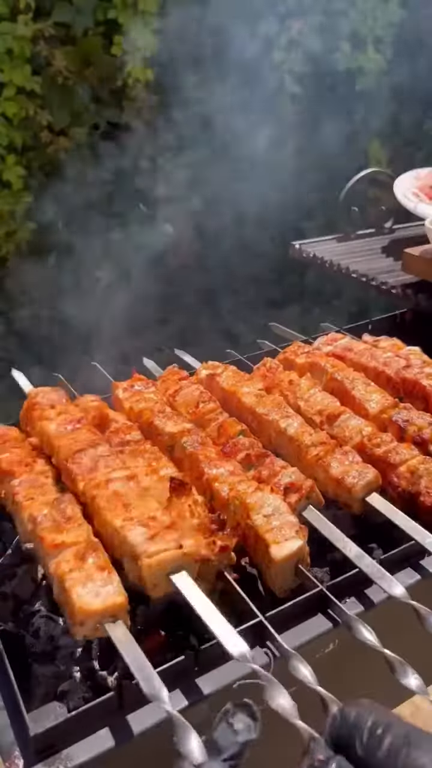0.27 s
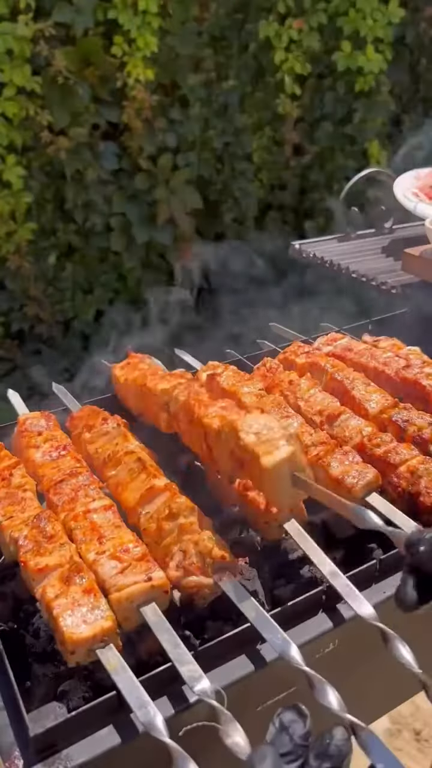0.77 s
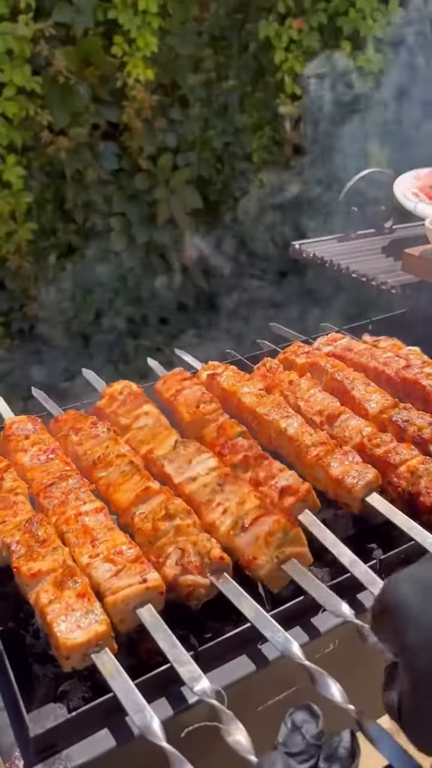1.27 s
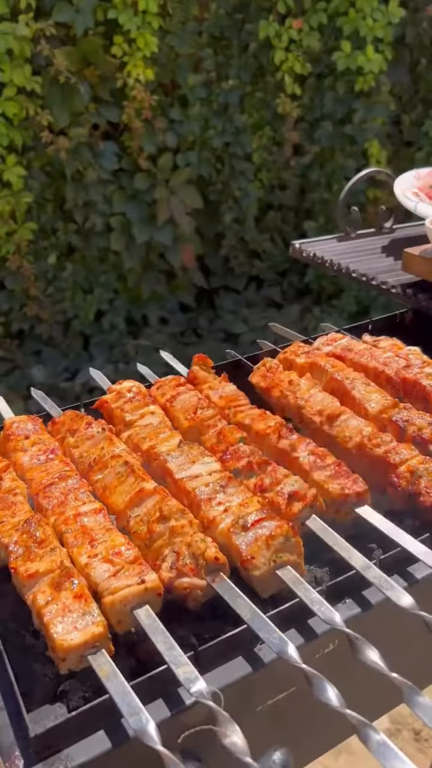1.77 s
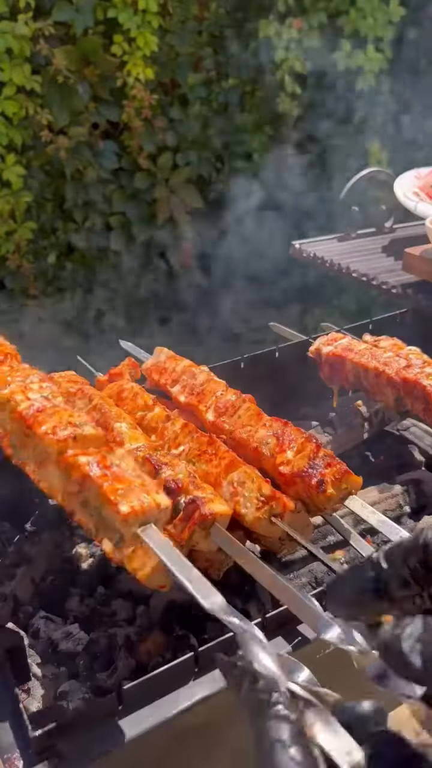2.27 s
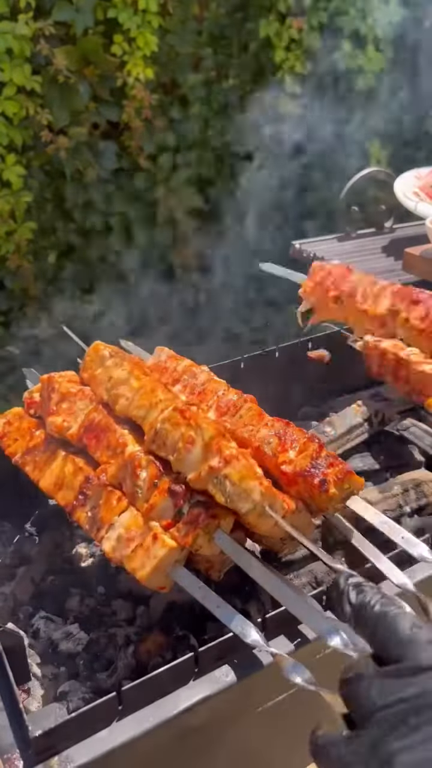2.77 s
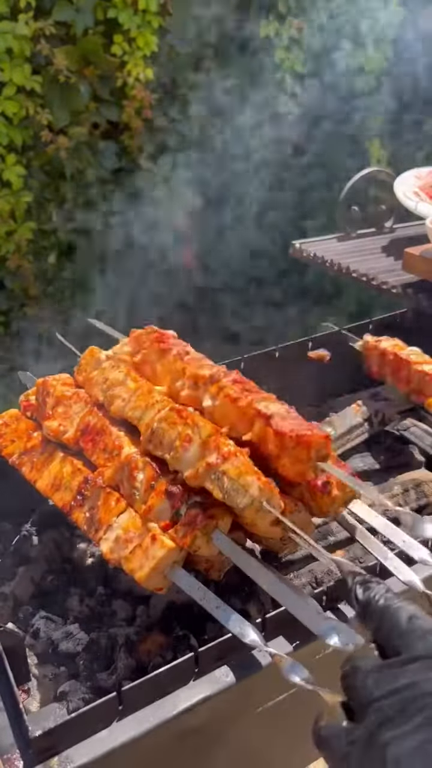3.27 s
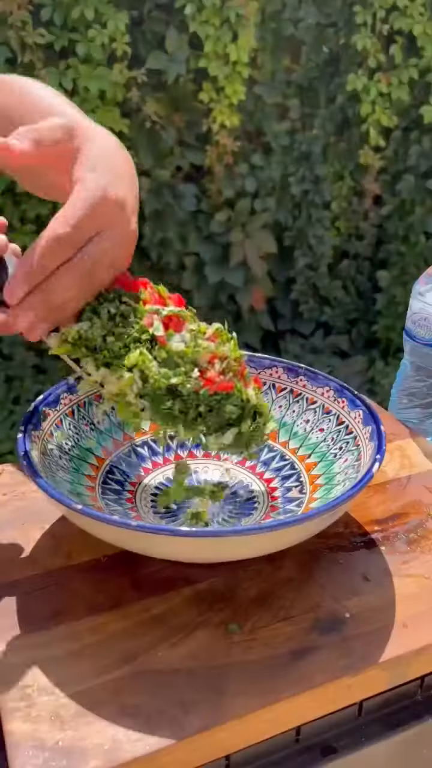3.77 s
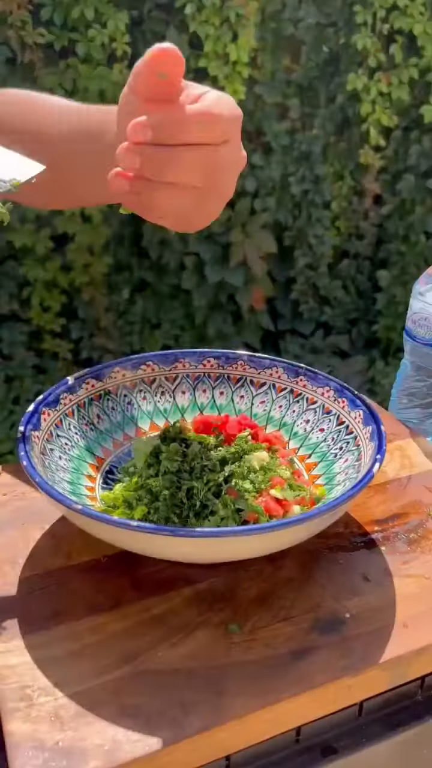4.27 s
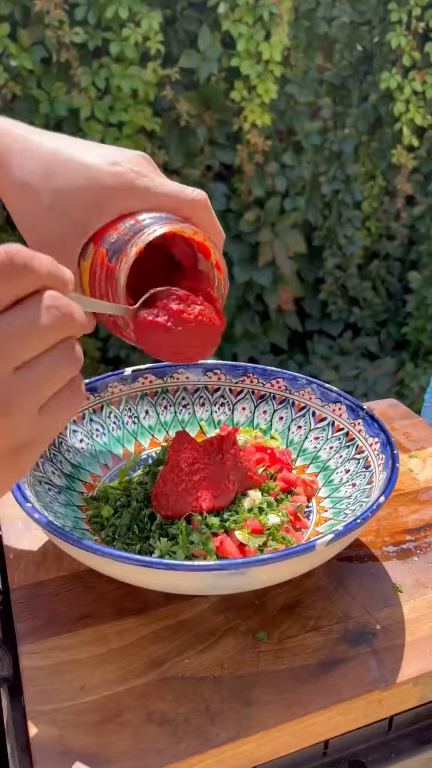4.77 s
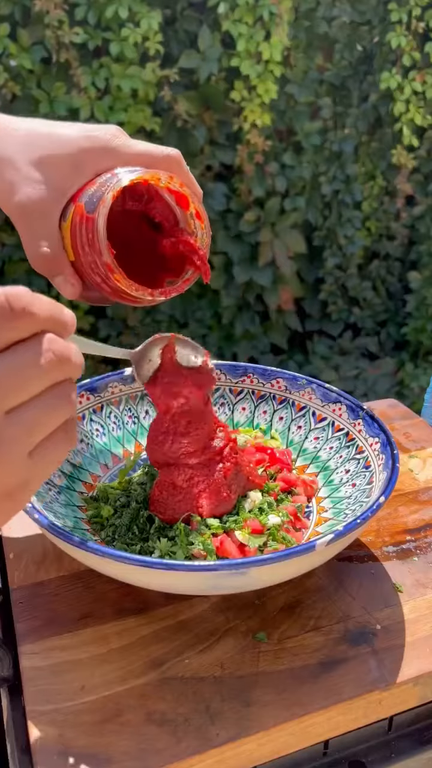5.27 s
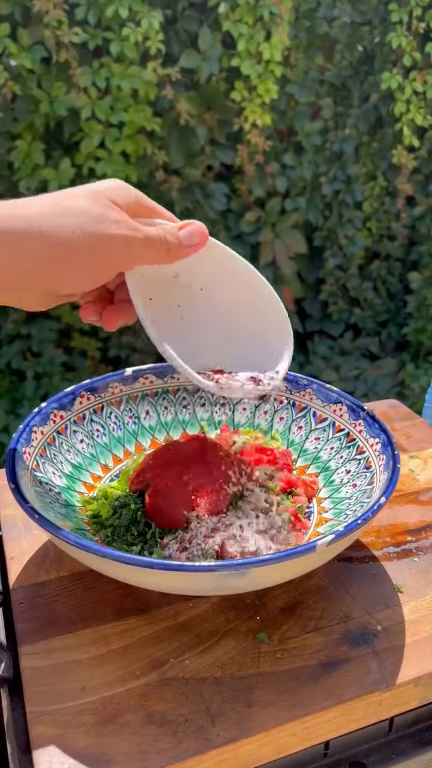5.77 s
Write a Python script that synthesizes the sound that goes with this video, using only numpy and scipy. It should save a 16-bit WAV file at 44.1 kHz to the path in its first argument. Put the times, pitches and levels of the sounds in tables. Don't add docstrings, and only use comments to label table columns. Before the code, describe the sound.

Loaded metal skewers clang and knock on a steel charcoal trough over hissing fat, then herbs scrape, a glass jar clinks and chopped onion patters.

```python
import sys
import numpy as np
from scipy import signal
from scipy.fft import rfft, irfft, next_fast_len
from scipy.io import wavfile

SR = 44100
rng = np.random.default_rng(int(sys.argv[2]) if len(sys.argv) > 2 else 0)


def waveform_to_disk(signal):
    frames = np.transpose(np.atleast_2d(signal))
    scaled = np.clip(frames, -1, 1) * 32767
    samples = np.round(scaled).astype(np.int16)
    wavfile.write(sys.argv[1], SR, samples)


def field_ratio(decibels):
    return 10 ** (np.asarray(decibels, dtype=float) / 20)


N = 265482

CUTS = [
    0.149,
    0.694,
    1.394,
    2.096,
    2.774,
    3.408,
    4.291,
    5.404,
]


def rms_one(x):
    return x / np.sqrt(np.mean(x ** 2) + 1e-20)


def in_time(rows, outside=None):
    s, *columns = np.transpose(rows)
    return [np.interp(np.arange(N) / SR, s, c, outside, outside) for c in columns]


def at_hz(points, hz):
    points = np.array(points)
    return np.interp(np.log(hz), np.log(points[:, 0]), points[:, 1])


def band(x, low_hz, high_hz):
    return signal.sosfilt(signal.butter(2, [low_hz, min(high_hz, .45 * SR)], "band", fs=SR, output="sos"), x)


def drift(rate):
    r = np.exp(-80 * np.pi * rate / SR)
    slow = signal.lfilter([1], [1, -2 * r, r * r], rng.standard_normal(N // 40 + 2002))[2000:]
    return np.interp(np.arange(N) / 40, np.arange(len(slow)), rms_one(slow))


def grains(per_s, spread_db, size=N):
    sizes = field_ratio(spread_db * np.minimum(rng.exponential(1, size), 5)) * rng.choice([-1, 1], size)
    return rms_one(sizes * (rng.random(size) < per_s / SR))


def resonate(x, hz, width_hz):
    r = np.exp(-np.pi * width_hz / SR)
    return rms_one(signal.lfilter([1, 0, -1], [1, -2 * r * np.cos(2 * np.pi * hz / SR), r * r], x))


def grains_in(bands, per_s, flicker_db, side, size):
    out = 0
    for hz, width_hz, level_db in bands:
        mid, apart = [resonate(grains(per_s, 1.0, size=size), hz, width_hz) for part in ("mid", "apart")]
        flicker = field_ratio(level_db + flicker_db * drift(22)[:size])
        out = out + flicker * (mid + side * apart * [[1], [-1]])
    return rms_one(out)


def mode_bank(modes, size=8000):
    hz, level_db, t60 = np.transpose(modes)[:, :, None].astype(np.float32)
    t = np.arange(size, dtype=np.float32) / SR
    decay = np.exp(np.log(10) / 20 * (level_db - 60 * t / t60))
    return decay * np.sin(2 * np.pi * hz * t)


def dense_bank(shape, count, damping=0.89):
    # frequency in Hz, t60 in seconds.
    ring_times = [(480, 0.065), (1400, 0.097), (3000, 0.12), (6000, 0.094), (15000, 0.052)]
    hz = np.sort(rng.uniform(shape[0][0], shape[-1][0], count))
    return hz, mode_bank(np.transpose([hz, at_hz(shape, hz), at_hz(ring_times, hz) / damping]))


def strike(bank, contact, side, tilt_db=0):
    sign, spread, lean = rng.standard_normal((3, len(bank)))
    weights = np.sign(sign) * field_ratio(2 * spread + tilt_db) * (1 + side * lean * [[1], [-1]])
    sound = signal.fftconvolve(weights.astype(np.float32) @ bank, contact[None], axes=1)
    return sound / np.abs(sound.mean(axis=0)).max()


def chatter(length_ms, landing=5.2, size=2600):
    t = np.arange(size) / SR
    holds = np.exp(-(1000 * t / np.clip(length_ms, .3, 30)) ** 1.4)
    contacts = rng.standard_normal(size) * (rng.random(size) < .07)
    full_landing = landing * (np.arange(size) == round(.0015 * SR))
    return contacts * holds * np.clip(t / 0.0056, 0, 1) + full_landing


def add(out, sound, s):
    start = round(s * SR)
    later_cuts = [round(c * SR) for c in CUTS if round(c * SR) > start]
    stop = min(later_cuts + [N, start + sound.shape[-1]])
    out[:, start:stop] += sound[..., :stop - start]


def swells(rows):
    t = np.arange(N) / SR
    take = np.searchsorted(CUTS, t)
    return sum(field_ratio(2 * db) * np.exp(-((t - s) / half_s) ** 2) * (take == np.searchsorted(CUTS, s))
               for s, db, half_s in rows)


def blows():
    # start in seconds, clang in dB, trough boom in dB, blade in dB, dullness in dB per octave.
    clinks = [(0.0552, -30.5, -49.5, -43.5, -1), (0.3612, -18.5, -35, -28, 2),
              (0.4222, -6, -12, -19.5, 2.5), (0.5224, -29, -24, -33, 2.5), (0.8123, -7, -28.5, -12, -3),
              (0.9598, -21.5, -35, -24, 3.5), (1.6338, -2.5, -14.5, -12.5, 1), (1.748, -8.5, -17, -18.5, 0),
              (2.591, -27.5, -46, -42, 1), (3.151, -51, -30, -42, 7)]
    drops = [(0.2413, -7, -14.5, -20, -1.5), (0.3835, -17.5, -27, -27, 3),
             (0.4035, -19.5, -40.5, -26.5, 3.5), (0.7758, -32, -37, -41, 1.5),
             (0.9985, -30, -32, -27.5, 4.5), (1.1154, -36, -29.5, -45, 2), (1.1805, -44, -48, -44, 7),
             (1.2666, -20, -30, -26.5, 2.5), (1.3349, -35, -33, -36.5, 3),
             (1.6476, -9.5, -17.5, -13.5, 1.5), (3.168, -33, -28.5, -29.5, 9)]
    slides = [(1.151, -42, -39, -36, 4.5), (2.5432, -27, -51, -47.5, 0), (2.7167, -44, -39.5, -50, 6.5),
              (3.0505, -18.5, -30.5, -29, 5), (3.0639, -26, -43, -25, 3)]
    # start in seconds, boom in dB.
    bounces = [(0.6343, -32), (0.6843, -25), (1.082, -44), (1.2394, -39), (1.844, -24), (1.927, -36),
               (1.9995, -39), (2.055, -44), (2.1107, -37.5), (2.165, -50.5), (3.2087, -33), (3.33, -34.5)]
    rebounds = [(s, boom_db - 12, boom_db, boom_db - 13, 4.5) for s, boom_db in bounces]
    kinds = [(clinks, 4.6, 4.1), (drops, 8.6, 4.1), (slides, 23.8, 1.2), (rebounds, 5.2, 4.1)]
    return sorted((*row[:4], ms, landing, row[4]) for rows, ms, landing in kinds for row in rows)


def skewers():
    # frequency in Hz, level in dB per Hz.
    sheet_shape = [(820, -34), (1400, -8.5), (2060, -3), (2310, -7.5), (2740, -6), (12900, -10),
                   (14700, -13), (16000, -15.5)]
    # frequency in Hz, level in dB.
    blade_shape = [(480, -15.5), (600, -9), (760, -1), (860, -3.5), (920, -9), (1000, -8), (1240, -8),
                   (1450, -12.5)]
    # frequency in Hz, level in dB, t60 in seconds.
    trough_modes = [(254, 1.5, 0.053), (317, 2.5, 0.058), (373, -3.5, 0.076), (220, -15.5, 0.054),
                    (234, -8.5, 0.11), (255.3, -7, .2), (282.6, -9, 0.16), (299.8, -5.5, 0.28),
                    (337, -10, 0.2), (350, -15.5, 0.24)]
    out = np.zeros((2, N))
    hz, sheet = dense_bank(sheet_shape[1:], count=900)
    blade = dense_bank(blade_shape, count=45, damping=0.84)[1]
    trough = mode_bank(trough_modes)
    for s, clang_db, boom_db, blade_db, length_ms, landing, dull_db in blows():
        contact = chatter(length_ms, landing)
        add(out, field_ratio(clang_db - 3.0) * strike(sheet, contact, 0.68, -dull_db * np.log2(hz / 4000)), s)
        add(out, field_ratio(blade_db + 3) * strike(blade, contact, .15), s)
        add(out, field_ratio(boom_db + 4.5) * strike(trough, contact, .03), s + .003)
    thin = signal.butter(2, 185, "high", fs=SR, output="sos")
    return signal.sosfilt(np.vstack([thin, thin]), out)


def scrapes():
    # middle in seconds, peak in dB, half length in seconds.
    drags = [(.03, -54, 0.028), (.205, -50.5, 0.017), (.375, -51, .012), (.405, -37, 0.011),
             (.99, -36, 0.021), (1.05, -48, 0.017), (1.17, -43, 0.038), (1.3, -45.5, 0.038),
             (3.12, -46.5, 0.042), (3.19, -45.5, 0.017), (3.23, -55, 0.024), (3.345, -50, 0.014)]
    # frequency in Hz, width in Hz, level in dB.
    rim = [(680, 300, 1.5), (970, 150, -1.5), (1270, 400, -10), (2090, 480, -5), (3240, 1500, -7),
           (6000, 4000, -14.5)]
    out, size = np.zeros((2, N)), round(CUTS[5] * SR)
    out[:, :size] = grains_in(rim, 1500, flicker_db=3.5, side=0.41, size=size)
    return np.sqrt(swells(drags)) * out


def rings():
    # start in seconds, level in dB, frequency in Hz, t60 in seconds.
    tones = [(0.057, -25, 432, 0.036), (0.36, -27.5, 850, 0.058), (.404, -26.5, 817, 0.065),
             (.8125, -5, 706, 0.049), (.8125, -14, 654, 0.053), (0.811, -14.5, 1070, .03),
             (.961, -22, 728, 0.094), (.985, -27, 712, 0.078), (1.48, -34, 347, 0.097),
             (1.635, -9.5, 252.4, 0.13), (1.64, -18, 303, 0.096), (1.75, -22, 752, 0.093),
             (2.593, -32, 6600, 0.091), (2.722, -26, 241, 0.063), (3.375, -43, 60.4, .15),
             (4.298, -27, 63.55, 0.079), (5.001, -49, 1135, 0.082), (5.004, -50, 1263, .04),
             (5.003, -51, 900, .04), (.346, -40, 7800, .015), (.362, -27, 9000, .02),
             (.428, -17.5, 300, .08), (1.752, -16.5, 275, .06), (2.112, -40.5, 302.8, 0.29),
             (4.306, -48, 852, .2), (3.056, -30.5, 338, .15), (3.153, -34, 302, 0.091),
             (3.178, -27.5, 311, 0.16), (0.386, -26.5, 3400, 0.061), (.386, -32.5, 8800, 0.089),
             (0.424, -21, 7300, 0.074), (1.636, -18, 6810, 0.057), (1.642, -21.5, 10180, 0.055),
             (3.056, -31, 1990, 0.055), (3.058, -34, 770, .12), (3.062, -28, 1000, 0.06),
             (3.073, -40, 1240, 0.074), (3.172, -27, 790, .07), (3.288, -44, 750, .06),
             (4.699, -44, 807, 0.075), (4.699, -44.5, 2500, .08), (4.703, -52, 4230, .05),
             (4.707, -53, 4683, .08), (4.704, -51, 812, .05), (4.729, -59, 2480, .1),
             (4.305, -36, 3250, .04), (4.708, -46, 2130, 0.035), (4.738, -54, 810, .05)]
    out = np.zeros((2, N))
    for s, level_db, hz, t60 in tones:
        soft_start = np.clip(np.arange(8000) / SR * hz / 2, 0, 1)
        add(out, mode_bank([(hz, level_db, t60)]) * soft_start, s)
    return out


def thumps():
    # middle in seconds, level in dB, frequency in Hz, half length in seconds.
    sways = [(1.501, -29, 56.6, 0.016), (1.605, -39.5, 78.8, 0.025), (1.677, -37, 75, 0.016),
             (1.756, -45.5, 59.7, .02), (1.895, -37.5, 68, 0.027)]
    t = np.arange(N) / SR
    return sum(field_ratio(db) * np.exp(-((t - s) / half_s) ** 2) * np.cos(2 * np.pi * hz * (t - s))
               for s, db, hz, half_s in sways)


def spits():
    # start in seconds, peak in dB, centre in Hz.
    bursts = [(0.72, -26.5, 5815), (0.7678, -33, 6270), (2.2404, -34.5, 7060), (2.3432, -28, 9040),
              (2.444, -37.5, 7500), (2.5298, -32.5, 5550), (2.7172, -28.5, 8040), (2.7576, -43, 10500),
              (2.76, -15.5, 7350), (2.7845, -30.5, 8500), (2.8838, -26.5, 7710), (2.9643, -28, 9960),
              (3.0313, -31, 3390), (3.319, -36.5, 8460), (3.6865, -45, 5860), (3.83, -44, 6000),
              (3.881, -42, 2500), (3.912, -39, 3000), (3.93, -41, 6450), (3.98, -48, 5000),
              (4.028, -45, 6000), (1.04, -37, 7000), (3.7738, -40, 5580), (4.07, -44, 7360),
              (4.9754, -47, 5460), (0.3618, -13.5, 8000), (0.3837, -19, 4000), (1.3366, -27.5, 4470),
              (1.6351, -8, 6000), (0.8131, -9, 7500), (2.053, -41, 3000), (1.737, -29.5, 3005),
              (2.5435, -30, 6000), (1.6485, -12, 11000), (2.319, -39.5, 4500), (2.392, -47, 6000),
              (2.47, -44, 6500), (2.512, -49, 5500)]
    out, t = np.zeros((2, N)), np.arange(900) / SR
    for s, peak_db, centre_hz in bursts:
        fading = np.exp(-t / 0.0014) + 0.12 * np.exp(-t / 0.0041)
        mid, side = rng.standard_normal((2, len(t))) * fading
        snap = band(mid + 0.47 * side * [[1], [-1]], centre_hz / 4.0, min(centre_hz * 1.6, 15800))
        add(out, field_ratio(peak_db - 3.0) * snap / np.abs(snap.mean(axis=0)).max(), s)
    return out


def herbs():
    # time in seconds, level in dB.
    sliding = [(3.64, -73), (3.792, -55.5), (3.882, -56.5), (3.924, -50), (4.06, -68.5), (4.07, -62),
               (4.088, -69), (4.14, -79)]
    # frequency in Hz, width in Hz, level in dB.
    colour = [(2280, 1400, -4), (5080, 2300, 2.5), (7740, 690, -5), (8800, 4100, -6), (11600, 1700, 2),
              (14000, 1600, -17)]
    out, start, stop = np.zeros((2, N)), round(sliding[0][0] * SR), round(sliding[-1][0] * SR)
    level = field_ratio(in_time(sliding, -120)[0] - 1.0)[start:stop]
    add(out, level * grains_in(colour, 5000, flicker_db=3.0, side=0.11, size=len(level)), start / SR)
    return out


def jar():
    # start in seconds, peak in dB, low mode in dB, contact in ms.
    taps = [
        (4.2914, -32, -46, 2.2),
        (4.3048, -20, -39, 0.63),
        (4.326, -40, -52, 17),
    ]
    # frequency in Hz, level in dB, t60 in seconds.
    low_modes = [(823, -7, 0.066), (902, -3, 0.046), (1190, -18, 0.027)]
    high_modes = [(2116, 4, 0.041), (2270, 7, 0.022), (2380, -7, 0.058), (2790, -3, 0.074),
                  (2600, 7.5, 0.015), (2920, -1, 0.024), (3320, -5, 0.025), (4270, -13.5, 0.086),
                  (4890, -14, 0.057), (8000, -5.5, 0.011)]
    lip_modes = [(818, -5.5, 0.072), (2090, 4, 0.05), (2484, -1, .05), (2570, -5, 0.031), (3165, -8, 0.037),
                 (4160, -11, 0.055), (4683, -12.5, 0.048), (5300, -23, .04)]
    # frequency in Hz, level in dB.
    wall_shape = [(600, -32), (2200, 10), (3300, 3), (5000, -2), (8000, -3), (15000, -41)]
    # start in seconds, peak in dB, contact in ms, dullness in dB per octave.
    grates = [
        (4.698, -51, 10, -2.5),
        (4.705, -45, 7, -1),
        (4.722, -48, 25, 2),
        (4.745, -49.5, 29, 2),
        (4.999, -54, 12.3, 0),
    ]
    # time in seconds, level in dB.
    paste = [(4.82, -70.5), (4.856, -61), (4.898, -58), (4.94, -74)]
    out, low, high = np.zeros((2, N)), mode_bank(low_modes), mode_bank(high_modes)
    wall = dense_bank(wall_shape, count=100, damping=2.6)[1]
    for s, peak_db, low_db, length_ms in taps:
        contact = chatter(length_ms)
        add(out, field_ratio(peak_db + 0.5) * strike(high, contact, .1), s)
        add(out, field_ratio(low_db + 3.5) * strike(low, contact, 0.15), s)
        add(out, field_ratio(peak_db - 7.5) * strike(wall, contact, 0.45), s)
    lip, octaves = mode_bank(lip_modes), np.log2(np.array(lip_modes)[:, 0] / 2000)
    for s, peak_db, length_ms, dull_db in grates:
        add(out, field_ratio(peak_db) * strike(lip, chatter(length_ms, landing=0.53), .1, -dull_db * octaves), s)
    slips = grains(1300, spread_db=0.0)
    drag = rms_one(rms_one(band(slips, 890, 1400)) + 0.53 * rms_one(band(slips, 1600, 3000)))
    return out + field_ratio(in_time(paste, -120)[0] + 4.5) * drag


def onion():
    # time in seconds, level in dB.
    pour = [(5.41, -77), (5.5, -69), (5.606, -59.5), (5.672, -67), (5.69, -76), (5.86, -82), (6.02, -90)]
    # start in seconds, level in dB, t60 in seconds.
    heaps = [(5.488, -63, 0.11), (5.52, -57, 0.067), (5.543, -42.5, 0.14), (5.566, -49, .08),
             (5.593, -43.5, 0.051), (5.648, -48, 0.095), (5.72, -63, 0.079), (5.745, -60.5, 0.055),
             (5.784, -55, 0.039), (5.835, -54, 0.047), (5.918, -63, 0.064)]
    # frequency in Hz, width in Hz, level in dB.
    dish = [(4070, 30, -11), (5460, 250, -6), (5800, 110, -3.5), (6790, 79, 0), (8110, 64, -2),
            (9570, 47, -2), (10370, 480, -6), (11500, 330, 0.5), (11720, 440, 1), (12200, 200, -4),
            (13560, 100, -16), (14300, 150, -20)]
    # start in seconds, peak in dB.
    patter = [(5.4203, -52), (5.4364, -45), (5.473, -55), (5.4887, -49), (5.515, -47), (5.531, -47),
              (5.544, -46), (5.558, -47), (5.7246, -59), (5.7406, -59), (5.8006, -58), (5.853, -57.5),
              (5.447, -47), (5.936, -52), (5.948, -47.5), (5.964, -47), (5.461, -52), (5.502, -52),
              (5.98, -52)]
    out, start = np.zeros((2, N)), round(CUTS[-1] * SR)
    t = np.arange(start, N) / SR
    flow = field_ratio(in_time(pour, -120)[0] + 3.5)[start:]
    for s, level_db, t60 in heaps:
        flow = flow + np.clip((t - s) / .004, 0, 1) * field_ratio(level_db - 60 * np.abs(t - s) / t60)
    add(out, flow * grains_in(dish, 1400, flicker_db=2.5, side=0.25, size=len(t)), start / SR)
    dying = np.exp(-np.arange(400) / SR / .002)
    for s, peak_db in patter:
        tick = band(rng.standard_normal(size=400) * dying, 1430, 4200)
        add(out, field_ratio(peak_db - 2.0) * tick[None] / np.abs(tick).max(), s)
    return out


def rattle():
    out, t = np.zeros((1, N)), np.arange(SR // 2) / SR
    rise_s, t60_s, follows = 0.021, 0.5, 0.89
    shape = (1 - np.exp(-t / rise_s)) * field_ratio(-120 * t / t60_s)
    for s, clang_db, boom_db, blade_db, *rest in blows():
        add(out, field_ratio(2 * follows * (blade_db + 25.5)) * shape, s)
    return out[0]


def air_levels():
    # breeze in dB, yard in dB, distant whirr in dB.
    takes = [(-56.5, -54.5, -63.5), (-59, -55, -64), (-58, -49.5, -65), (-55.5, -49.5, -61.5),
             (-75.5, -70, -67.5), (-73, -61, -85), (-71.5, -75, -69.5), (-74, -66, -70),
             (-65, -60.5, -71.5)]
    # middle in seconds, peak in dB, half length in seconds.
    gusts = [(0.0, -48, 0.038), (.2, -50.5, 0.12), (.48, -46, 0.072), (.6, -46.5, 0.19),
             (.846, -48.5, 0.052), (1.03, -51.5, 0.085), (1.31, -45, 0.033), (1.498, -50.5, 0.061),
             (1.72, -40, 0.088), (1.9, -52.5, 0.076), (2.09, -51.5, 0.038), (2.2, -62, 0.1),
             (2.59, -63, 0.042), (2.76, -59, 0.066), (2.92, -68, 0.074), (3.15, -58, 0.091),
             (3.41, -64, 0.066), (4.32, -58, 0.034), (5.01, -66, 0.039), (5.74, -62, 0.12)]
    shuffles = [(3.41, -52, 0.04), (3.588, -48.5, 0.052), (3.75, -55, .03), (3.85, -57, 0.24),
                (4.36, -62, 0.19), (5.5, -74.5, 0.11)]
    clatter = [(3.1, -52.5, 0.038), (1.36, -58.5, .02), (4.5, -69.5, 0.082)]
    leaf_stirs = [(4.72, -59, 0.026), (4.89, -67, 0.1), (5.44, -67.5, 0.026), (5.7, -71, 0.2),
                  (5.93, -72, 0.032), (6.01, -68, 0.013)]
    # time in seconds, level in dB.
    sizzling = [(0, -54.5), (.28, -57), (.47, -43), (.6, -54.5), (.76, -51), (1.2, -54), (1.33, -60.5),
                (1.9, -76), (2.1, -55.5), (2.4, -60), (2.58, -56.5), (2.765, -58.5), (2.78, -50),
                (3.4, -50.5), (3.41, -66.5), (4.3, -70), (4.53, -75.5), (6.02, -87.5)]
    breeze, yard, whirr = field_ratio(2 * np.transpose(takes))[:, np.searchsorted(CUTS, np.arange(N) / SR)]
    shaken = rattle()
    power = [breeze + swells(gusts),
             yard + swells(shuffles) + field_ratio(2 * -40) * shaken,
             whirr + swells(clatter) + field_ratio(2 * -52.5) * shaken,
             field_ratio(2 * in_time(sizzling)[0]) + swells(leaf_stirs)]
    return 10 * np.log10(power)


def background():
    # frequency in Hz, level in dB per Hz.
    breeze = [(25, -23), (45, -6.5), (60, -2.5), (90, -7), (140, -6), (200, -39)]
    yard = [(76, -42.5), (130, -3.5), (345, -0.5), (473, -4), (812, -7), (1200, -13), (1560, -41.5),
            (2640, -120)]
    whirr = [(590, -38.5), (1000, -15), (1580, 2.5), (2700, -7.5), (6300, -25.5), (7000, -38),
             (9100, -59.5), (15400, -120)]
    sizzle = [(880, -31), (1500, -3.5), (1760, -8), (2140, 3), (2370, -7), (10000, -6), (14900, -11.5),
              (16000, -12)]
    rustle = [(2000, -6.5), (3300, -7), (5400, -11), (7000, -8.5), (7600, -19.5), (16000, -30.5)]
    # frequency in Hz, likeness from 0 to 1.
    likeness = [(40, .85), (180, 1), (550, 0.57), (1650, 1), (5000, 0.2), (15000, 0.18)]
    # time in seconds, frequency in Hz, dB against the whirr.
    whine = [(0, 1567, -10), (2.2, 1412, -6.5), (3.4, 1520, -22), (3.9, 1291, 0), (4.28, 1300, -15.5),
             (4.3, 1559, -1.5), (5.4, 1582, -2), (5.41, 1850, -0.5), (6.02, 1850, 2.5)]
    # share added at 7-9 kHz, share added at 10-11 kHz.
    crests = [(0.044, 0.2), (0, 0.97), (0.02, .3), (0.22, 0.01), (0.5, 0.1), (0.13, 0.2), (0, 0.1),
              (0.067, 0), (0, 0.3)]
    breeze_db, yard_db, whirr_db, hiss_db = air_levels()
    t = np.arange(N) / SR
    at_grill = t < CUTS[5]
    edges = np.append(25 * 2 ** np.arange(0, 9, .4), 16500)
    centres, widths = np.sqrt(edges[1:] * edges[:-1]), np.diff(edges)
    layers = [(breeze, 30, 130), (yard, 250, 1000), (whirr, 1200, 2800),
              (sizzle, 4000, 15000), (rustle, 4000, 15000)]
    power = np.array([field_ratio(2 * at_hz(shape, centres)) * widths for shape, low, high in layers])
    power /= [[p[(centres > low) & (centres < high)].sum()] for p, (shape, low, high) in zip(power, layers)]
    white = rng.standard_normal((2, 2, N))
    bursts = grains(4000 * field_ratio(3.3 * drift(14)), spread_db=5.0)
    sources = [np.vstack([noise, bursts]) for noise in white]
    together, out = drift(6.6), 0
    smooth_layers = field_ratio(2 * np.array([breeze_db, yard_db - 3.5, whirr_db + 0.5]))
    for k, hz in enumerate(centres):
        mid, side, fizz = band(sources[k % 2], edges[k], edges[k + 1]) * np.sqrt(SR / 2 / widths[k])
        alike = np.clip(at_hz(likeness, hz), 0, .99)
        hiss = np.sqrt(np.where(at_grill, power[3, k], power[4, k])) * field_ratio(hiss_db + 0.71 * together)
        gain = np.sqrt(power[:3, k] @ smooth_layers + (0.78 * hiss) ** 2) * field_ratio(0.64 * drift(4.4))
        wide = np.sqrt((1 - alike) / (1 + alike)) * side * [[1], [-1]]
        out = out + gain * (mid + wide) + 0.17 * hiss * fizz
    whine_hz, whine_db = in_time(whine)
    tone = np.sin(2 * np.pi * np.cumsum(whine_hz) / SR) * np.sqrt(2)
    out += field_ratio(whirr_db + whine_db) * drift(45) * tone
    low_crest, high_crest = np.transpose(crests)[:, np.searchsorted(CUTS, t)]
    out += low_crest * band(out, 6800, 9500) + high_crest * band(out, 9200, 11000)
    return signal.sosfilt(signal.ellip(8, 1, 35, 15600, fs=SR, output="sos"), out)


def scene():
    grip = [0, 0, .1, .8, 0.64, .2, .1, 0, 0]
    t = np.arange(N) / SR
    joins = np.prod([np.clip(0.1 + np.abs(t - c) / 0.011, 0, 1) for c in CUTS], axis=0)
    mix = joins * (background() + skewers() + onion())
    mix = mix + jar() + spits() + herbs() + rings() + thumps() + scrapes()
    return mix - np.clip(grip, 0, 1)[np.searchsorted(CUTS, t)] * band(mix, 11600, 12700)


def ports(x):
    # frequency in Hz, level in dB.
    port_db = [(99, 0.5), (270, 0), (450, 0), (740, 4), (1220, -3), (2010, 0.0), (9080, 0), (15000, 0)]
    # frequency in Hz, phase in radians.
    port_lead = [(0, 0.5), (380, 0.2), (860, -1.42), (1290, 0.0), (4130, -0.0), (8960, -1), (9990, 1),
                 (15700, -1), (16200, -5)]
    # frequency in Hz, level in dB.
    mic = [(6000, 0), (8800, 1.5), (10800, -0.5), (11700, -1.5), (12150, -4), (12700, -2), (14900, 1),
           (16500, -0.5)]
    size = next_fast_len(N + 4096)
    hz = np.arange(size // 2 + 1) * SR / size + 1
    half = field_ratio(at_hz(port_db, hz) / 2) * np.exp(.5j * np.interp(hz, *np.transpose(port_lead)))
    return irfft(rfft(x, size) * field_ratio(at_hz(mic, hz)) * [half, 1 / half], size)[:, :N]


def low_pass(x):
    return signal.sosfilt(signal.butter(12, 16650, fs=SR, output="sos"), x)


def record(dry):
    x = signal.sosfilt(signal.butter(2, 42, "high", fs=SR, output="sos"), ports(dry))
    soft = 1.2 * np.tanh(x / 1.2)
    x = signal.sosfilt(signal.cheby2(12, 60, 16750, fs=SR, output="sos"), soft)
    return low_pass(x)


dry = scene()
out = record(dry)
waveform_to_disk(out)
```